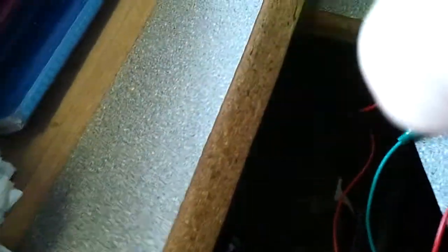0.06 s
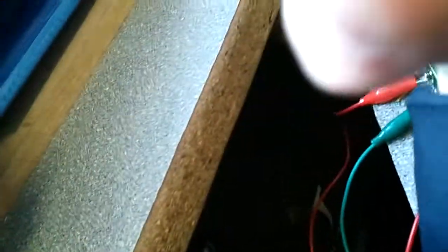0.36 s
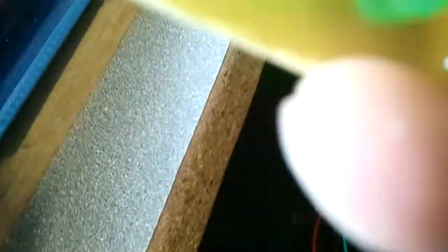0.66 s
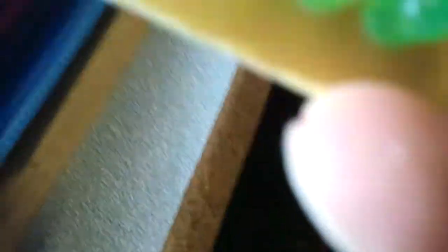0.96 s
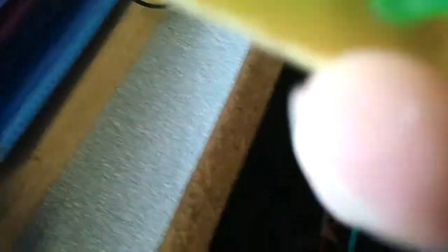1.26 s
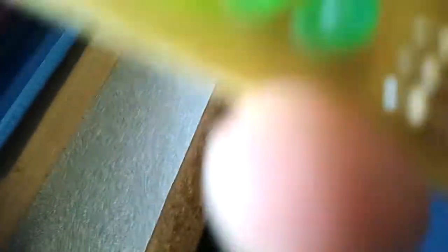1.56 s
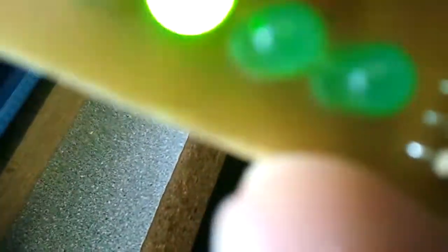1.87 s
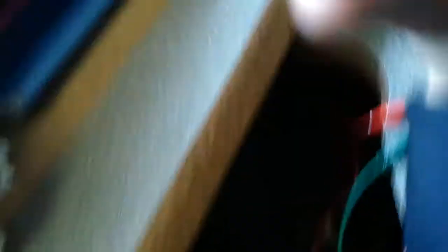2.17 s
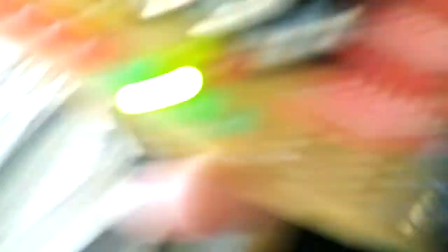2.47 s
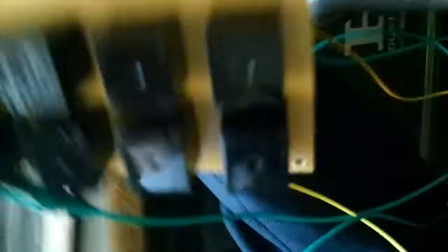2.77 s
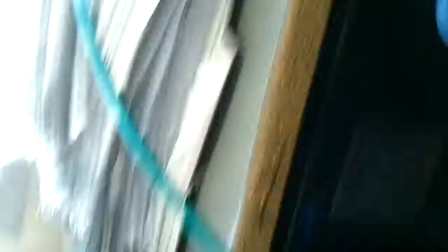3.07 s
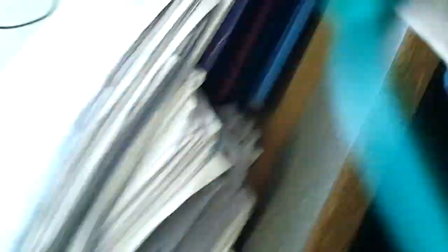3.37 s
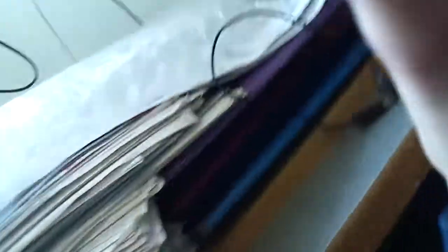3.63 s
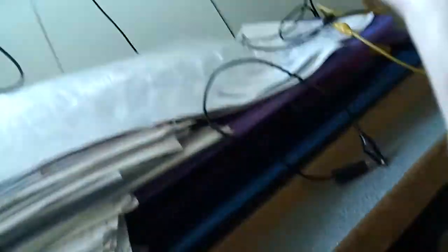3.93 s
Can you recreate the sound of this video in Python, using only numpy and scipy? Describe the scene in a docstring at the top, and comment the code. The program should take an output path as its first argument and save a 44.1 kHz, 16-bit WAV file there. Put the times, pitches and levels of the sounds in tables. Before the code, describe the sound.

Close electromechanical relay clicking speeds up to a fast rattle as a board is handled.

```python
"""A home-made relay clock on a workbench in a small room, close to a hand-held microphone.
Over a quiet rumble and after one small click, relays step about six times a second, ringing a spring.
At 1.1 s a switch snaps over and one relay chatters about three times as fast, ringing the board.
From about 2 s the board is turned in the hand, with rubbing and a bump, and the microphone
swings away: the chatter thins and more of the room is heard."""
import sys
import numpy as np
from scipy import signal
from scipy.fft import rfft, irfft, next_fast_len
from scipy.io import wavfile

SR = 44100
rng = np.random.default_rng(int(sys.argv[2]) if len(sys.argv) > 2 else 0)


def digitize_waveform(pressure):
    """Quantize a signal to 16-bit integers and store it at the path in sys.argv[1].

    Rows of a 2-D input are taken as channels; values are limited to [-1, 1].
    """
    field = np.atleast_2d(pressure).T
    bounded = np.clip(field, -1, 1)
    quanta = np.round(bounded * 32767).astype(np.int16)
    wavfile.write(sys.argv[1], SR, quanta)


N = 176400
TIME = np.arange(N) / SR  # seconds into the scene
HIT_TIME = np.arange(SR // 8) / SR  # seconds into one hit


def amp(db):
    """Decibels to gain."""
    return 10 ** (np.asarray(db) / 20)


def along(points, hz):
    """Read a curve of (hz, value) points on a log frequency axis."""
    point_hz, values = np.transpose(points)
    return np.interp(np.log(hz + 1), np.log(point_hz + 1), values)


def burst(x):
    """Scale a short sound to the energy of 4 ms at full level."""
    return x * np.sqrt(.004 * SR / (np.sum(x ** 2) + 1e-20))


def filtered(x, response):
    """Filter x by a gain given as a function of frequency."""
    size = next_fast_len(N + SR // 2)
    return irfft(rfft(x, size) * response(np.fft.rfftfreq(size, 1 / SR)), size)[:N]


def noise(colour):
    """Coloured noise of rms 1."""
    x = filtered(rng.standard_normal(N), lambda hz: amp(along(colour, hz)))
    return x / x.std()


def add(track, start_s, sound):
    """Mix a sound into the track."""
    i = int(np.clip(round(start_s * SR), 0, N))
    track[i:i + len(sound)] += sound[:N - i]


def room_rumble():
    """The room's quiet background, mostly bass, drifting a little in level."""
    colour = [(25, 4), (60, -3.5), (150, -12.5), (400, -14.5), (1000, -20), (2000, -22.5), (5000, -37.5),
              (14000, -34)]  # spectrum of the room noise: frequency_hz, gain_db
    swell = [(0, 5), (.5, .5), (1.1, -1), (2.8, 2), (3.15, 0), (3.552, -2), (3.8, 1.5)]  # its drift: time_s, change_db
    return amp(-52.5 + np.interp(TIME, *np.transpose(swell))) * noise(colour)


def crack(colour, t60, grain=None, size=1024, fresh_share=0.6):
    """An impact's fast-dying burst of coloured noise; a part's own grain makes its blows alike."""
    hiss = rng.standard_normal(size)
    if grain is not None:
        hiss = np.sqrt(fresh_share) * hiss + np.sqrt(1 - fresh_share) * grain[:size]
    hiss *= amp(-60 * HIT_TIME[:size] / t60)
    # a minimum-phase filter keeps the attack sharp
    cepstrum = irfft(np.log(amp(along(colour, np.fft.rfftfreq(size, 1 / SR)))))
    cepstrum[1:size // 2] *= 2
    cepstrum[size // 2 + 1:] = 0
    return burst(irfft(rfft(hiss) * np.exp(rfft(cepstrum))))


def thump(hz, t60):
    """One damped sine: a thump when low, a ring when high."""
    return burst(np.sin(2 * np.pi * hz * HIT_TIME) * amp(-60 * HIT_TIME / t60))


def switch_and_knocks():
    """The switch snap and knocks on the board each crack and swing a body; soft bumps only thump."""
    # switch and handling knocks: start_s, click_db, clack_db, body_db, body_hz, body_t60_s
    knocks = [(.0042, -19, -51, -35, 35.8, 0.14), (1.086, -11, -14, -19, 196, 0.014),
              (2.3964, -25, -30, -24.5, 80, 0.034), (3.7218, -32.5, -21, -27, 2180, 0.0019)]
    click_colour = [(130, -18), (330, 0), (700, -13.5), (950, -18), (1500, -12), (2700, -4.5), (4200, 0),
                    (5400, -17), (6500, 7.5), (8000, 7.5), (9100, 12.5), (11300, -4.5), (12500, 5),
                    (14500, -9)]  # bright part of a knock: frequency_hz, gain_db
    clack_colour = [(150, -26), (450, -24), (1000, -9.5), (1700, -5), (2200, 5.5), (3100, 5), (4000, 6),
                    (5200, 2), (6200, -13), (8000, -4), (12000, -9)]  # midrange part of a knock: frequency_hz, gain_db
    bumps = [(0.242, -41, 118, 0.33), (3.129, -36.5, 54, 0.064)]  # soft bumps of the hand: start_s, level_db, pitch_hz, t60_s
    out = np.zeros(N)
    for start_s, click_db, clack_db, body_db, hz, t60 in knocks:
        add(out, start_s, amp(click_db) * crack(click_colour, t60=.018))
        add(out, start_s, amp(clack_db) * crack(clack_colour, t60=.009))
        add(out, start_s, amp(body_db) * thump(hz, t60))
    for start_s, db, hz, t60 in bumps:
        add(out, start_s, amp(db) * thump(hz, t60))
    return out


def ring(modes, scatter_db=1.5, detune=0.0048, size=1024):
    """The damped modes of a struck metal part, a little different at every blow."""
    t = HIT_TIME[:size]
    hz, db, t60 = np.transpose(modes)[:, :, None]
    level_draw, pitch_draw = rng.standard_normal((2, len(modes), 1))
    sign = (-1) ** np.arange(len(modes))[:, None]
    decay = np.exp(-np.log(1000) * t / t60) / np.sqrt(t60)
    tones = np.sin(2 * np.pi * hz * (1 + detune * pitch_draw) * t)
    return burst(np.sum(sign * amp(db + scatter_db * level_draw) * decay * tones, 0))


def blow(track, start_s, db, modes, bounces, colour, crack_db, crack_t60, rise_s, grain=None):
    """Mix in one contact and its bounces, each ringing metal plus a crack, loose in time and level."""
    for delay_s, level_steps in bounces:
        hit = ring(modes) + amp(crack_db) * crack(colour, crack_t60, grain)
        hit *= 1 - np.exp(-HIT_TIME[:len(hit)] / rise_s)
        hit_s = start_s + delay_s + .00008 * rng.normal()
        db_per_step = 1.5 + 0.1931 * rng.normal()
        add(track, hit_s, amp(db + level_steps * db_per_step) * burst(hit))


def slow_relays():
    """Each step: a light tick, a rebounding strike that rings a spring, the next relay, then release."""
    steps = [(0.1502, -15, -18), (0.304, -16, -18.5), (0.4579, -17, -15.5), (.612, -19.5, -10.5),
             (.7672, -17.5, -8), (0.922, -19.5, -7.5), (1.0768, -20, -7.5)]  # main strikes: start_s, armature_db, spring_db (both ahead of their trims)
    releases = [(0.0479, -24), (0.2017, -24), (0.356, -27.5), (.510, -26.5), (.6651, -25.5), (0.82, -23.5),
                (0.9754, -22.5)]  # the relay lets go: start_s, level_db
    # ringing parts: pitch_hz, relative_energy_db, t60_s
    tick_modes = [(3030, 2.5, 0.0091), (3350, -29, 0.042), (4000, 1, 0.0043), (4500, -3, 0.012),
                  (6960, -5, 0.011), (8800, 1, 0.016), (9970, -3, .015)]
    strike_modes = [(2960, -23.5, .012), (4130, -8, 0.017), (4793, 3, 0.014), (6980, -9, .015),
                    (8380, -5.5, 0.014), (9230, -5, 0.014), (13200, -11, .01), (14200, -5, .01)]
    spring_modes = [(9680, -5.5, 0.013), (10300, 1.5, 0.017), (10850, 8, 0.0067), (11380, 3, 0.0083),
                    (11620, -10, .014)]
    next_relay_modes = [(1890, -23, 0.039), (4500, -3.5, .008), (7500, -12, .008), (8770, 2, 0.009),
                        (10300, -3, .005), (11300, 10, 0.0057), (14300, -6, 0.0063)]
    release_modes = [(1794, -9.5, 0.018), (4530, -3.5, 0.017), (4860, -4.5, 0.024), (6390, -2, 0.0069),
                     (7270, -4, 0.015), (8550, 2, 0.011), (11200, -1.5, 0.017), (13000, -8, .015)]
    # contact bounces: delay_s, level_steps (about 1.5 dB each)
    tick_bounces = [(0, -1.5), (.003, 0), (.006, -7.5)]
    release_bounces = [(0, -4), (.0032, -2.5), (.005, -4), (.008, -8)]
    single, rebound = [(0.00089, 0)], [(0, 0), (0.0024, -1)]
    colour = [(100, -10.5), (500, -4.5), (1000, -18.5), (1700, -4.5), (2400, -9), (3800, 4.5), (4900, -5),
              (5500, -10.5), (7000, 3.5), (11000, 0), (14500, 1)]  # crack of the contacts: frequency_hz, gain_db
    out = np.zeros(N)
    for start_s, armature_db, spring_db in steps:
        blow(out, start_s - .0134, -26.5, tick_modes, tick_bounces, colour,
             crack_db=-1, crack_t60=0.037, rise_s=0.00021)
        blow(out, start_s, armature_db - 3, strike_modes, rebound, colour,
             crack_db=-10, crack_t60=0.015, rise_s=0.00077)
        blow(out, start_s, spring_db - 3.5, spring_modes, rebound, colour,
             crack_db=-11.5, crack_t60=0.018, rise_s=0.00092)
        blow(out, start_s + 0.0098, -18.5, next_relay_modes, single, colour,
             crack_db=-6.5, crack_t60=0.011, rise_s=0.00041)
        add(out, start_s + 0.015, amp(-41.5) * thump(hz=1940, t60=0.03))  # last knock of the cover
    for start_s, db in releases:
        blow(out, start_s, db, release_modes, release_bounces, colour,
             crack_db=-1.5, crack_t60=0.019, rise_s=0.00019)
    return out


def fast_relay(held_s=.0125, trim_db=-1):
    """The coil pulls the armature in and holds it; it drops back on its stop and rings the board."""
    chatter = [(1.1176, -14, -18.5), (1.1653, -15, -19), (1.2224, -14.5, -20), (1.279, -17, -17.0),
               (1.3358, -16, -20), (1.3925, -17, -19.5), (1.4483, -16, -19), (1.505, -15.5, -20.5),
               (1.5626, -17, -19), (1.6195, -16, -18.5), (1.6764, -16.5, -19.5), (1.733, -15, -19),
               (1.7889, -17.5, -18.5), (1.8455, -15.5, -18.5), (1.9018, -16.5, -19.0),
               (1.9567, -16.5, -18.5), (2.014, -14.5, -19.5), (2.071, -16.0, -17), (2.127, -18.5, -20),
               (2.1837, -17, -20.0), (2.2394, -17.5, -20), (2.2961, -16.5, -17.5), (2.352, -15, -17),
               (2.4081, -15, -15.5), (2.4643, -15.0, -17.0), (2.5222, -15.0, -17.5), (2.5811, -15.5, -17.5),
               (2.6403, -17.5, -20.0), (2.6963, -18, -20.5), (2.7534, -19, -25), (2.8099, -18, -22.5),
               (2.8652, -17.5, -25), (2.922, -17.5, -26), (2.9779, -19.5, -25.5), (3.0339, -25, -26.5),
               (3.0889, -21.5, -27.5), (3.144, -22, -31), (3.2009, -22.5, -29.5), (3.2567, -23, -30),
               (3.314, -25, -25), (3.3704, -23.5, -26), (3.4267, -23.0, -26.5), (3.4832, -22.5, -23.5),
               (3.5394, -19.5, -24), (3.5953, -20.5, -23.0), (3.6514, -19.5, -23), (3.7076, -22, -21.5),
               (3.7644, -23, -20.5), (3.822, -19.5, -21.5), (3.878, -18.5, -22), (3.9332, -17.5, -22.5),
               (3.9901, -18.5, -24.0)]  # armature strokes: start_s, pull_db, drop_db (both ahead of their trims)
    # ringing parts: pitch_hz, relative_energy_db, t60_s
    pull_modes = [(343, -20, 0.036), (1300, -12, 0.014), (1818, -9.5, 0.036), (2475, -9, 0.0079),
                  (2977, -7.5, .018), (4340, -12, 0.012), (5500, -8.5, 0.0041), (7255, -7, 0.015),
                  (8847, 3.5, 0.0067), (9575, 5.5, 0.0079), (10400, -14, .007), (12330, -7, 0.006)]
    drop_modes = [(1314, -1.5, 0.011), (1900, -2.5, 0.022), (2580, -0.5, 0.012), (3120, -12, 0.0095),
                  (3980, 1, 0.0046), (7350, 3, 0.0041), (8940, 3, 0.0073), (9780, -1.5, .012),
                  (10570, 6.5, 0.0073), (11150, 3.5, 0.0061), (11960, 5.5, .005), (13800, -5, .008)]
    # contact bounces: delay_s, level_steps (about 1.5 dB each)
    pull_bounces = [(-.003, -25.5), (-.0013, -8.5), (0, -0.5), (.0012, -7.5), (.0031, -11), (.0058, -11)]
    drop_bounces = [(-.0013, -10.5), (0, 1), (.0017, -10.5)]
    # cracks of the contacts: frequency_hz, gain_db
    pull_colour = [(100, -24.5), (420, -4), (650, -3), (900, -14.5), (1500, -4.5), (2300, -8.5), (3900, 1),
                   (5900, -4.5), (7500, 1.5), (11500, 7), (14500, -4.5)]
    drop_colour = [(100, -8), (700, -3.5), (1500, -3.5), (3000, -3), (4200, 0), (5200, -2.5), (7200, 6),
                   (11500, 9.5), (14500, 1.5)]
    out = np.zeros(N)
    pull_grain, drop_grain = rng.standard_normal((2, len(HIT_TIME)))
    for start_s, pull_db, drop_db in chatter:
        drop_s = start_s + held_s
        blow(out, start_s, pull_db + trim_db, pull_modes, pull_bounces, pull_colour,
             crack_db=-5.5, crack_t60=0.028, rise_s=0.00029, grain=pull_grain)
        blow(out, drop_s, drop_db + trim_db, drop_modes, drop_bounces, drop_colour,
             crack_db=-3, crack_t60=0.01, rise_s=0.00077, grain=drop_grain)
        backstop_slap = -amp(drop_db - 18) * thump(hz=2450, t60=0.0016)
        board_hz = 1943 * (1 + 0.0413 * rng.normal())
        board_ring = amp(drop_db - 26) * thump(board_hz, t60=0.2)
        add(out, drop_s, backstop_slap + board_ring)
    return out


def microphone_turn(x, bass_hz=1140, lows_hz=3400, peak_octaves=0.34, treble_hz=10380):
    """The colour shifts as the microphone turns: two low shelves, a midrange peak, a treble shelf."""
    # tone along the turn: time_s, bass_db, lows_db, peak_db, peak_hz, treble_db
    shading = [(1.1, -1.5, 2, 2.5, 4000, 2.5), (1.9, 3.5, 2, 2, 3140, 1.5), (2.252, 1, -1, 6, 3220, -1.5),
               (2.55, 4.5, -2, 8.5, 2950, -3.5), (2.9, -5.5, -1.5, 2, 2830, -9.5),
               (3.15, -13.5, 0, 10.5, 4600, -7), (3.7, -23, -5.5, -1, 4600, -7.5),
               (3.77, 12, -9.5, 0.5, 4700, -10), (4, 6, -8, -2.5, 4740, -5)]
    hz, t, spectrum = signal.stft(x, SR, nperseg=256)
    hz = hz[:, None] + 1
    time_s, *columns = np.transpose(shading)
    bass_db, lows_db, peak_db, peak_hz, treble_db = (np.interp(t, time_s, c) for c in columns)
    bass = bass_db / (1 + (hz / bass_hz) ** 10)
    lows = lows_db / (1 + (hz / lows_hz) ** 6)
    peak = peak_db * np.exp(-(np.log2(hz / peak_hz) / peak_octaves) ** 2)
    treble = treble_db * (1 - 1 / (1 + (hz / treble_hz) ** 24))
    return signal.istft(spectrum * amp(bass + lows + peak + treble), SR, nperseg=256)[1][:N]


def finger_rub(catches_per_s=450, roughness_db=2.5):
    """Fingers slide over the board in many tiny catches."""
    levels = [(2.15, -74), (2.24, -37), (2.33, -36.5), (2.43, -34), (2.5, -54), (2.6, -45), (2.76, -48),
              (2.85, -42.5), (2.96, -35.5), (3.03, -46), (3.15, -58.5), (3.3, -49), (3.42, -54.5)]  # course of the rubbing: time_s, level_db
    colour = [(120, -40), (200, -11), (344, -17.5), (800, -13.5), (1510, -14), (2330, -6.5), (2900, -13.5),
              (4310, -3.5), (5400, -14), (9210, -2.5), (11600, -11), (15000, -37)]  # friction spectrum: frequency_hz, gain_db
    catches = np.interp(TIME * catches_per_s, np.arange(N), rng.standard_normal(N))
    friction = noise(colour) * amp(roughness_db * catches)
    level_db = np.interp(TIME, *np.transpose(levels), left=-120, right=-120)
    return friction / friction.std() * amp(level_db)


def room_reflections(x, build_s=0.0024, crossfade_s=.0564, count=7):
    """The small room's answer, fading from one short tail to the next as the microphone moves."""
    decay_times = [(200, 0.07), (2000, 0.078), (6000, 0.056), (14000, 0.11)]  # decay of the room: frequency_hz, t60_s
    colour = [(200, 4), (700, 8.5), (1500, 1), (3000, 1), (4200, 2.5), (5500, -1.5), (7000, 0),
              (9300, -4.5), (11000, -15.5), (14000, -3)]  # tone of the reflections: frequency_hz, gain_db
    out = np.zeros(N)
    position = TIME / crossfade_s
    for k in range(count):
        hz, t, spectrum = signal.stft(rng.standard_normal(SR // 3), SR, nperseg=256)
        tail_db = along(colour, hz)[:, None] - 60 * t / along(decay_times, hz)[:, None]
        tail = signal.istft(spectrum * amp(tail_db), SR, nperseg=256)[1]
        tail *= 1 - np.exp(-np.arange(len(tail)) / SR / build_s)
        share = np.sqrt(np.clip(1 - abs((position - k) % count - 1), 0, 1))
        out += signal.fftconvolve(x * share, tail / np.linalg.norm(tail))[:N]
    return out


def scene():
    """Relays and hands close up; the chatter's reflections grow as the microphone swings away."""
    near = slow_relays() + switch_and_knocks() + finger_rub()
    chatter = microphone_turn(fast_relay())
    away_db = np.interp(TIME, (1.8, 3.76), (0, 9))
    reflections = room_reflections(amp(-17.5) * near + amp(-15.5 + away_db) * chatter)
    return (near + chatter + reflections + room_rumble())[None]


def record(dry):
    """The mono microphone rounds off the highest peaks and keeps nothing above its band limit."""
    ceiling, top_hz = .66, 14800
    rounded = dry[0] / (1 + (dry[0] / ceiling) ** 6) ** (1 / 6)
    return filtered(rounded, lambda hz: 1 / np.sqrt(1 + (hz / top_hz) ** 120))[None]


dry = scene()
out = record(dry)
digitize_waveform(out)
```